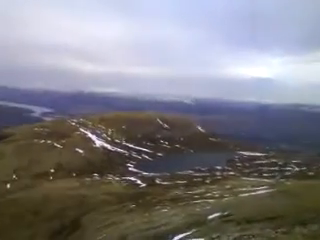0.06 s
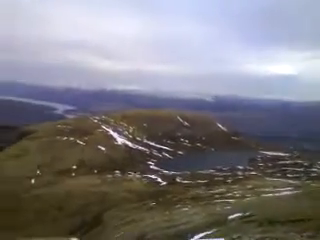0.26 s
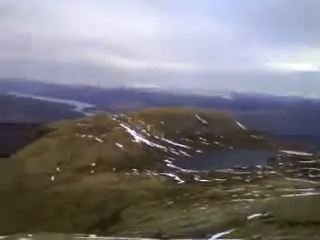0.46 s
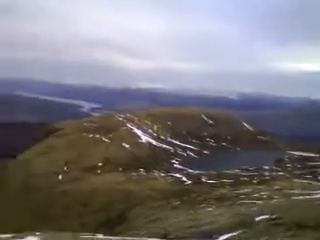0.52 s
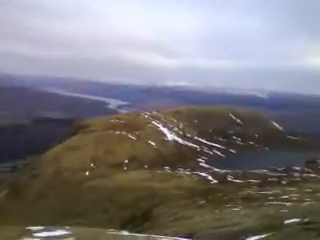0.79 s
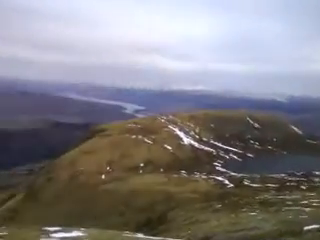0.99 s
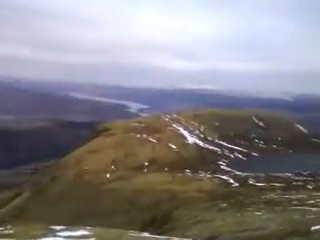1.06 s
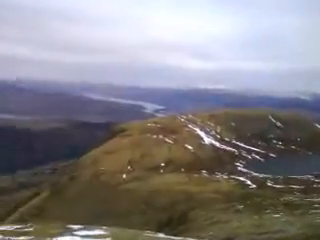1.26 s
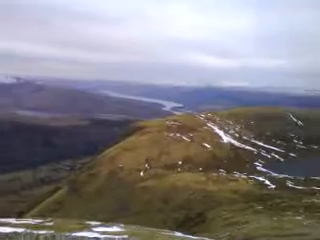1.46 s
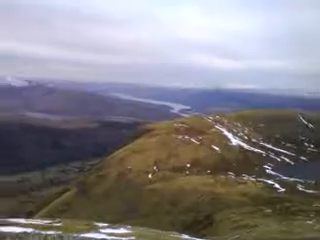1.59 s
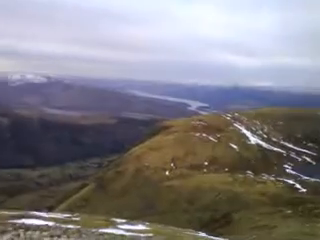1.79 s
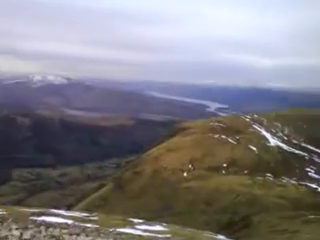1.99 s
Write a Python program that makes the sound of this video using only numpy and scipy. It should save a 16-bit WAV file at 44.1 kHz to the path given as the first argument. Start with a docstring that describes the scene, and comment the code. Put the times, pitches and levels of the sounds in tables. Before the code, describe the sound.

Loud gusts of wind rumble and slap against the microphone, with a faint hiss behind.

```python
"""An open hillside, where very strong wind buffets the microphone of a small camera.
Large eddies (swirls of air) rumble. As a gust grows, the flow tears into smaller ones,
so it gets louder, brighter and more ragged. The hardest eddies slap the microphone's opening.
A thin hiss of rushing air swells and fades behind it."""
import sys
import numpy as np
from scipy import signal
from scipy.fft import rfft, irfft
from scipy.io import wavfile
from scipy.ndimage import uniform_filter1d

SR = 44100
rng = np.random.default_rng(int(sys.argv[2]) if len(sys.argv) > 2 else 0)


def to_wav(s):
    """Save 16-bit WAV."""
    ch = np.atleast_2d(s).T  # columns
    pcm = np.round(np.clip(ch, -1, 1) * 32767)  # PCM
    wavfile.write(sys.argv[1], SR, pcm.astype(np.int16))


N = 89390


def undb(db):
    """Turn decibels into a number to multiply by."""
    return 10 ** (np.asarray(db) / 20)


def curve(rows):
    """Join (time, value) points with straight lines and round the corners."""
    rows = np.array(rows)
    return uniform_filter1d(np.interp(np.arange(N) / SR, rows[:, 0], rows[:, 1]), size=180)


def at_pitch(rows, hz):
    """Read a (frequency, value) table at hz, with octaves evenly spaced."""
    rows = np.array(rows)
    return np.interp(np.log(np.maximum(hz, 1)), np.log(rows[:, 0]), rows[:, 1])


def noise(gain):
    """Noise of typical size 1; gain(f) says how strong each frequency is."""
    x = irfft(rfft(rng.standard_normal(N)) * gain(np.fft.rfftfreq(N, 1 / SR)), N)
    return x / x.std()


def waver(hz):
    """A random wobble of typical size 1, up to about hz times a second."""
    return noise(lambda f: f / (f + hz / 10) / (1 + (f / hz) ** 4))


def hiss():
    """Air rushing past makes a smooth hiss that gets duller as it fades."""
    # how loud the rushing air is (time [s], level [dB])
    loudness = [(0, -37), (.07, -38), (.14, -40.5), (.24, -49), (.36, -52), (.47, -49), (.55, -76.5),
                (.64, -67), (.76, -54), (.92, -71), (1.0, -79.5), (1.15, -72), (1.29, -60.5), (1.33, -56.5),
                (1.42, -53.5), (1.6, -53.5), (1.78, -59), (1.95, -62), (2.03, -78)]
    # tone of the hiss (frequency [Hz], relative level [dB])
    tone = [(400, 0), (1000, 0.5), (1500, 0.5), (2200, 5.5), (2800, -3), (3400, -5), (4400, -1.5),
            (5500, -6), (6200, -3.5), (6600, -10), (7000, -30.5), (8000, -44.5)]
    treble_hz, full_treble_db, dulling = 4300, -41, 0.56
    air = noise(lambda f: undb(at_pitch(tone, f)))
    level_db = curve(loudness)
    low = signal.sosfiltfilt(signal.butter(2, treble_hz, fs=SR, output="sos"), air)
    treble_db = np.maximum(dulling * (level_db - full_treble_db), -5.5)
    return (low + undb(treble_db) * (air - low)) * undb(level_db)


def slaps():
    """A hard eddy gives the microphone a sharp push or pull, wrapped in a moment of churning air."""
    # the hardest eddies (time [s], relative strength [dB], rise time [s])
    hard_eddies = [(0.033,-17,.0012),(.123,-21.5,0.00028),(0.306,-22,0.0011),(0.43,-6.5,0.0019),(0.461,-11,0.0026),(0.482,-6,0.00026),(0.715,-16.5,0.0016),(0.762,-10,0.00028),(.816,-8.5,.0005),(.823,-4,0.00028),(.826,-11,0.00045),(.858,-13,.0005),(0.876,-6.5,0.00044),(0.888,-2.5,0.0001),(0.894,-9,0.00018),(0.912,-10,0.00024),(0.936,-13.5,0.00043),(0.944,-20,0.00061),(0.986,-13,0.00023),(.999,-16,0.00032),(1.086,-42,0.00058),(1.223,-39,0.00056),(1.282,-27.5,0.00055),(1.498,-6,0.0011),(1.505,-6.5,0.001),(1.561,-8.5,0.00014),(1.592,-8.5,0.00029),(1.603,-17,0.00054),(1.609,0.5,0.00078),(1.656,-23.5,0.0012),(1.712,-6.5,0.00029),(1.731,-7,.0005),(1.827,-1,0.00098),(1.852,-6,0.0001)]
    spike_db, fall_share = 4, .4  # a slap falls faster than it rises
    churn_db, churn_hz, churn_s = -18.5, 1050, 0.0019
    churn = noise(lambda f: f / churn_hz / (1 + (f / churn_hz) ** 2))
    push_or_pull = rng.choice([-1, 1], len(hard_eddies))
    t = np.arange(N) / SR
    spikes, churn_level = 0, 0
    for (peak_s, db, rise_s), sign in zip(hard_eddies, push_or_pull):
        gap_s = np.abs(t - peak_s)
        width_s = rise_s * np.where(t < peak_s, 1, fall_share)
        spikes += sign * undb(db) * np.exp(-gap_s / width_s)
        churn_level += undb(db) * np.exp(-gap_s / churn_s)
    pressure = undb(spike_db) * spikes + undb(churn_db) * churn_level * churn
    return signal.sosfilt(signal.butter(3, 2826, fs=SR, output="sos"), pressure)  # soften the treble


def buffeting():
    """Big eddies rumble, middle-sized ones roar, and small ones follow the gusts and flutter together."""
    # force of the gusts (time [s], level [dB])
    gusts = [(0,-37),(.03,-41),(.05,-51),(.12,-41.5),(.2,-45.5),(.285,-33.5),(.295,-35),(.315,-36),(.33,-38),(.38,-38.5),(.405,-29.5),(.44,-35.5),(.48,-21),(.505,-24),(.52,-37.5),(.535,-27.5),(.55,-46.5),(.62,-56.5),(.68,-56),(.69,-42.5),(.712,-33),(.745,-44),(.76,-25),(.795,-22),(.807,-21.5),(.824,-15),(.832,-25.5),(.85,-27),(.858,-32),(.868,-28.5),(.88,-16),(.892,-18.5),(.897,-25.5),(.905,-14),(.925,-26),(.94,-18),(.955,-24),(.972,-32),(.983,-16.5),(.992,-47),(1.012,-24.5),(1.055,-42.5),(1.074,-29),(1.09,-36.5),(1.14,-55),(1.2,-35),(1.214,-33),(1.236,-30),(1.255,-39),(1.285,-26.5),(1.305,-47),(1.36,-30.5),(1.39,-38),(1.43,-30),(1.458,-23.5),(1.482,-38.5),(1.497,-16.5),(1.52,-25.5),(1.56,-25),(1.575,-29.5),(1.59,-17),(1.612,-16),(1.625,-29),(1.648,-28),(1.658,-17.5),(1.68,-30.5),(1.713,-21.5),(1.733,-21.5),(1.745,-38.5),(1.775,-33),(1.785,-22.5),(1.8,-34),(1.812,-22),(1.822,-32.5),(1.832,-14.5),(1.852,-23),(1.862,-29),(1.893,-18.5),(1.92,-31.5),(1.945,-33),(1.96,-41),(1.985,-23),(2.005,-26.5),(2.03,-23)]
    # rumble of the big eddies (time [s], level [dB])
    big_eddies = [(0,-23),(.25,-21.5),(.35,-24.5),(.43,-14.5),(.5,-25),(.56,-31),(.62,-35.5),(.67,-40),(.72,-23),(.78,-11.5),(.86,-22.5),(.98,-19),(1.06,-29.5),(1.14,-28.5),(1.21,-24.5),(1.28,-16),(1.34,-28.5),(1.42,-20.5),(1.5,-23.5),(1.6,-14.5),(1.66,-23.5),(1.71,-19.5),(1.76,-25.5),(1.84,-15),(1.92,-25.5),(2.03,-25)]
    # low roar of the middle-sized eddies (time [s], level [dB])
    middle_eddies = [(0,-22.5),(.03,-21),(.06,-38.5),(.28,-32),(.31,-17.5),(.35,-41),(.43,-16.5),(.48,-13.5),(.53,-27),(.58,-45),(.64,-61),(.71,-24),(.735,-34),(.79,-21),(.86,-25.5),(.94,-17.5),(1.03,-22),(1.14,-41.5),(1.22,-23.5),(1.28,-27.5),(1.33,-30),(1.37,-21),(1.48,-29),(1.497,-17.5),(1.62,-18.5),(1.72,-20),(1.76,-27),(1.85,-16),(1.95,-24.5),(2.02,-13.5)]
    # tone of the wind at the reference levels below (frequency [Hz], level in a 1 Hz slice [dB])
    tone = [(15, -42), (28, -47), (50, -44), (80, -44), (125, -43.5), (230, -48), (400, -53), (700, -59.5),
            (1300, -69.5), (2200, -81), (3100, -89.5), (4200, -89), (4900, -104.5), (6300, -103),
            (7300, -112), (8000, -105)]
    # how fast the small eddies grow with the gust (frequency [Hz], growth [dB per dB])
    growth = [(350, .9), (800, 1.0), (1800, 1.02), (4000, 0.67), (8000, 0.56)]
    # how much the small eddies flutter (frequency [Hz], depth [dB])
    flutter_depth = [(200, 2), (600, 3), (1800, 2.5), (3500, 1), (7000, 5.2)]
    gust_reference_db, rumble_reference_db, roar_reference_db = -27.5, -25, -24
    tear_s, tear_from_db, tear_growth, tear_hz = 0.11, -28.5, 0.67, 1240
    rumble_top_hz, roar_top_hz = 119, 378
    gust_db = curve(gusts)
    rumble_db = curve(big_eddies) - rumble_reference_db
    roar_db = curve(middle_eddies) - roar_reference_db
    # a gust that stays strong tears the flow, and the treble jumps
    lasting_db = uniform_filter1d(gust_db, int(tear_s * SR))
    tear_db = tear_growth * np.maximum(lasting_db - tear_from_db, 0)
    flutter = waver(hz=135)
    wind = 0
    for hz in 20 * 2 ** np.arange(0, 9, .5):  # bands of noise, half an octave apart
        band = noise(lambda f: np.cos(np.pi / 2 * np.clip(2 * np.log2((f + 1) / hz), -1, 1)))
        width_hz = hz * np.log(2) / 2
        rumble_share = 1 / (1 + (hz / rumble_top_hz) ** 4)
        roar_share = 1 / (1 + (hz / roar_top_hz) ** 4)
        blast_db = at_pitch(growth, hz) * (gust_db - gust_reference_db)
        blast_db += tear_db / (1 + (tear_hz / hz) ** 2)
        upper_db = roar_share * roar_db + (1 - roar_share) * blast_db
        upper_db += at_pitch(flutter_depth, hz) * flutter
        swell_db = rumble_share * rumble_db + (1 - rumble_share) * upper_db
        flicker_db = waver(hz=40)  # each band also flickers on its own
        wind += band * undb(at_pitch(tone, hz) + swell_db + flicker_db) * np.sqrt(width_hz)
    return wind


def scene():
    """All of the wind at one microphone."""
    return (buffeting() + slaps() + hiss())[None]


def record(dry):
    """The microphone rounds off the biggest swings, and the recorder cuts the top treble."""
    ceiling, fade_s, top_hz = 0.58, .004, 8200
    rounded = ceiling * np.tanh(dry / ceiling)
    # the sound fades in and out briefly so its ends do not click
    samples_from_edge = np.minimum(np.arange(N), N - 130 - np.arange(N))
    fade = np.clip(samples_from_edge / (fade_s * SR), 0, 1)
    return signal.sosfilt(signal.ellip(8, .2, 80, top_hz, fs=SR, output="sos"), fade * rounded)


dry = scene()
out = record(dry)
to_wav(out)
```